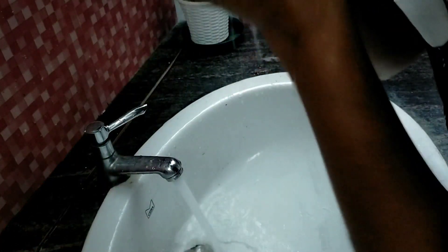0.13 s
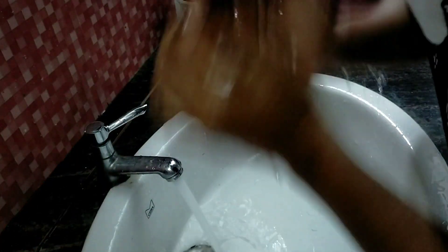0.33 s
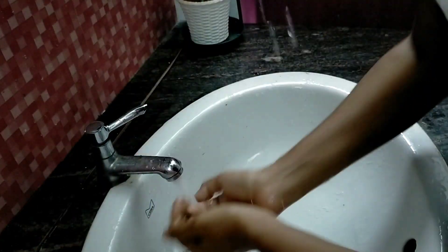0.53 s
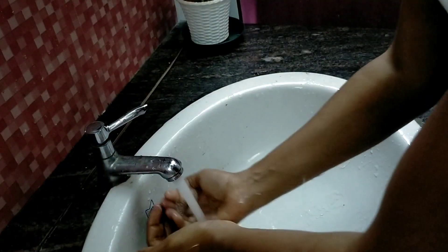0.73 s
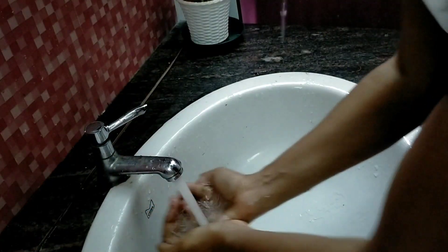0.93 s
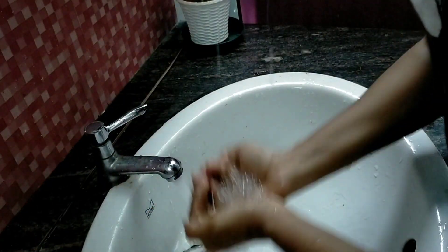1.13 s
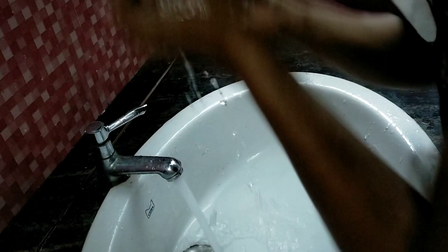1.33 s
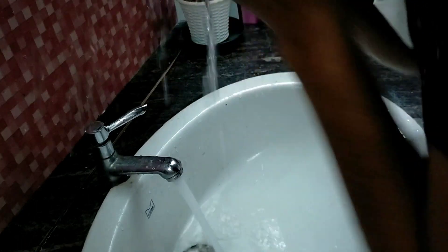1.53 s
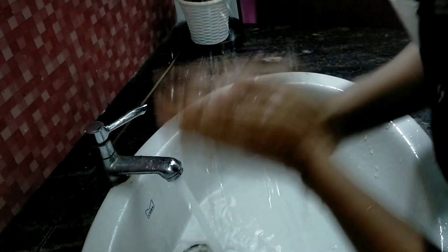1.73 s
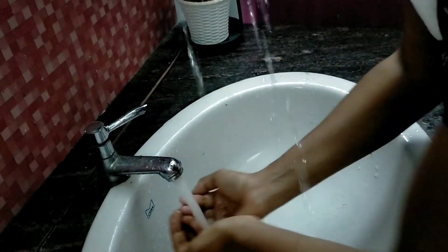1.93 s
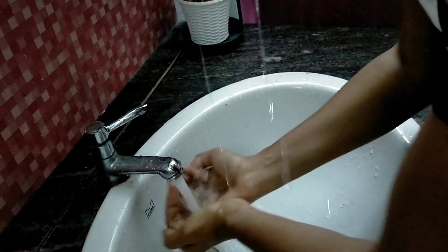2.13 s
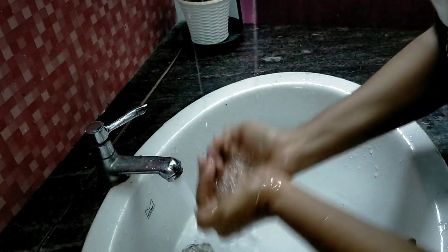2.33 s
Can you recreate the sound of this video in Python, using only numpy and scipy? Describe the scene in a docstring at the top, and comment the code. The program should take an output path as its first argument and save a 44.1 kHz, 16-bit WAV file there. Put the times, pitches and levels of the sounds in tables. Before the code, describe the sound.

A tap runs into a ceramic basin in a small tiled bathroom, bright and hissing; cupped hands hush it, then water drops back in two splashy bursts, heard close with a short room echo.

```python
"""A tap's jet spatters on the glaze of a ceramic basin in a small tiled bathroom, hushed while cupped hands catch it.
The spatter is shaped noise with droplet bursts and tiny bubbles; the gurgle is noise and bubbles ringing in the bowl.
Water falls back from the hands as splats (noise bursts), plops and drips (single bubbles with rising pitch).
The basin is knocked a few times (decaying modes), and a low hum lies beneath."""
import sys
import numpy as np
from scipy import signal
from scipy.fft import rfft, irfft
from scipy.io import wavfile

SR = 44100
rng = np.random.default_rng(int(sys.argv[2]) if len(sys.argv) > 2 else 0)


def file_out(sig):
    """Save sig as 16-bit WAV at sys.argv[1]."""
    # one column per channel
    cols = np.atleast_2d(sig).T
    # limit, then scale
    lim = np.clip(cols, -1, 1)
    pcm = np.round(lim * 32767).astype(np.int16)
    wavfile.write(sys.argv[1], SR, pcm)


N = 108882   # samples

# Course of the jet, joined by straight lines: start_s [s], hiss_db [dB rms], gurgle_db [dB rms]
JET_COURSE = [(0, -34.5, -44.5), (.12, -39, -46), (.3, -37.5, -48), (.47, -38.5, -46), (.645, -38, -47),
              (0.669, -43.5, -47), (.9, -43.5, -49), (1.1, -46.5, -49), (1.19, -46, -50.5),
              (1.235, -38, -46), (1.33, -39, -46.5), (1.42, -34, -43.5), (1.445, -36, -40),
              (1.53, -38, -45), (1.7, -36.5, -48.5), (1.817, -37, -41), (1.824, -32, -36.5),
              (1.87, -37, -39.5), (1.9, -41, -42), (1.94, -32, -46.5), (1.98, -41, -46.5),
              (2.07, -39.5, -48), (2.16, -44, -49), (2.35, -46.5, -50), (2.41, -39, -46),
              (2.469, -38.5, -43.5)]
# Colour of water striking the glaze: pitch_hz [Hz], gain_db [dB, relative]
SPATTER_COLOUR = [(1200, -9), (2300, -8.5), (3500, -13.5), (4180, -10), (5990, -11.5), (7200, -7.5),
                  (7890, -2.5), (8300, 0), (9480, -5.5), (10900, -4), (12600, -7), (14000, -4.5),
                  (15100, -0.5), (15600, -5)]
DROPLETS_PER_S, DROPLET_DECAY_S = 900, 0.00096   # the rate is nominal and wanders
DROPLET_SPREAD_DB, DROPLET_SHARE_DB = 4, -3.5
FIZZ_PER_S, FIZZ_CYCLES, FIZZ_SHARE_DB = 300, 50.7, -8.5   # tiny high bubbles
SPATTER_LOW_HZ = 2704   # the hiss of the stream starts here


def droplet_patter():
    """Shot noise: random impacts, each a decaying noise burst in one of five registers."""
    born = rng.random(N) < DROPLETS_PER_S * amp(4 * drift(25)) / SR
    sizes = born * amp(DROPLET_SPREAD_DB * np.minimum(rng.exponential(1, N), 4))
    register = rng.integers(0, 5, N)
    decay = np.exp(-1 / (DROPLET_DECAY_S * SR))
    patter = np.zeros(N)
    for k, hz in enumerate(np.geomspace(3000, 13000, num=5)):
        impacts = sizes * (register == k) + 1e-18   # the tiny offset keeps the filter off zero
        burst = signal.lfilter([1], [1, -decay], impacts) * rng.standard_normal(N)
        band = signal.butter(1, [hz / 2.69, hz * 1.695], "band", fs=SR, output="sos")
        patter += signal.sosfilt(band, burst)
    return rms_one(patter)


def spatter():
    """Broadband impact noise: a turbulent sheet, bubble fizz and droplets share one spectrum."""
    sheet = amp(0.854 * drift(5.9)) * rng.standard_normal(N)
    fizz = amp(FIZZ_SHARE_DB) * swarm(FIZZ_PER_S, 2800, 15062, FIZZ_CYCLES)
    droplets = amp(DROPLET_SHARE_DB) * droplet_patter()
    stream = colour(sheet + fizz + droplets, SPATTER_COLOUR)
    high = signal.butter(4, SPATTER_LOW_HZ, "high", fs=SR, output="sos")
    start_s, hiss_db, _ = np.transpose(JET_COURSE)
    return amp(over_time(start_s, hiss_db)) * rms_one(signal.sosfilt(high, stream))


# Colour of the gurgle: pitch_hz [Hz], gain_db [dB, relative]
GURGLE_COLOUR = [(180, -51.5), (300, -11.5), (371, -10.5), (432, -11.5), (758, -23), (1100, -6.5),
                 (1320, -10.5), (1400, -6), (2040, 1), (2290, 2.5), (2500, 3.5), (3290, 1), (6000, -12),
                 (7800, -27), (13200, -120)]
# Air resonances of the bowl: pitch_hz [Hz], width_hz [Hz], level_db [dB, relative to the direct wash]
BOWL_RESONANCES = [(1005, 29.5, -2), (1221.5, 25.6, -1), (1423.3, 19, -0.5), (1633.4, 55.4, 0),
                   (1870, 17.6, 1), (2210, 54, 0.5), (2333.5, 27.4, -2), (2959.5, 39.3, 2.5)]
BUBBLES_PER_S, BUBBLE_CYCLES, BUBBLE_SHARE_DB = 1000, 14.59, -8.5
BRIGHTEN_S, BRIGHTEN_HZ, BRIGHTEN_DB = 2.1, 2600, -4   # from then on the gurgle below that pitch sinks


def gurgle():
    """Forced resonance: a wash of noise and small bubbles excites the air modes of the bowl."""
    wash = amp(1.37 * drift(7.06)) * rng.standard_normal(N)
    wash += amp(BUBBLE_SHARE_DB) * swarm(BUBBLES_PER_S, 906.4, 5102, BUBBLE_CYCLES)
    rung = wash.copy()
    for pitch_hz, width_hz, level_db in BOWL_RESONANCES:
        r = np.exp(-np.pi * width_hz / SR)
        poles = [1, -2 * r * np.cos(2 * np.pi * pitch_hz / SR), r * r]
        rung += amp(level_db) * signal.lfilter([(1 - r * r) / 2, 0, (r * r - 1) / 2], poles, wash)
    body = rms_one(colour(rung, GURGLE_COLOUR))
    # the low part sinks over a tenth of a second
    low = signal.sosfiltfilt(signal.butter(4, BRIGHTEN_HZ, fs=SR, output="sos"), body)
    sink = (1 - amp(BRIGHTEN_DB)) * np.clip((np.arange(N) / SR - BRIGHTEN_S) * 10, 0, 1)
    start_s, _, gurgle_db = np.transpose(JET_COURSE)
    return amp(over_time(start_s, gurgle_db)) * (body - sink * low)


# Splats of falling water: start_s [s], level_db [dB, before colouring], decay_s [s], pitch_hz [Hz, centre]
FALLING_SPLATS = [(.0365, -20.5, 0.00208, 6800), (.0614, -17, 0.00145, 12100),
                  (0.0685, -15.5, 0.00322, 3750), (.071, -16.5, 0.0016, 7000), (.0897, -18.5, 0.002, 9200),
                  (.161, -26, 0.0057, 6000), (0.22, -29, 0.003, 8900), (.2546, -14.5, 0.00103, 7940),
                  (0.3522, -25, 0.00245, 9000), (.501, -22, 0.00229, 5870), (0.5856, -25, 0.00327, 9120),
                  (0.6324, -20, 0.00208, 10400), (.905, -29, 0.0024, 11900), (1.207, -23, 0.00094, 9000),
                  (1.2331, -32.5, 0.0043, 9800), (1.2564, -26.5, 0.00177, 13000),
                  (1.289, -16, 0.00107, 13000), (1.294, -23.5, 0.0038, 11000), (1.3176, -24, 0.0026, 12000),
                  (1.3443, -25.5, 0.0047, 9000), (1.4245, -20.5, 0.008, 1290),
                  (1.4323, -18.5, 0.0074, 2200), (1.644, -24.5, 0.00323, 7950), (1.6916, -27, 0.0054, 8950),
                  (1.7634, -23.5, 0.00324, 9050), (1.8209, -17.5, 0.0049, 3000), (1.8312, -21, 0.005, 8860),
                  (1.842, -17, 0.0025, 13000), (1.849, -19.5, 0.00328, 1625), (1.8514, -16.5, 0.0021, 7900),
                  (1.881, -23.5, 0.0045, 10000), (1.88, -28, 0.0028, 2200), (1.909, -25.5, 0.011, 1446),
                  (1.916, -24.5, 0.0037, 7000), (1.931, -21.5, 0.00207, 9000), (1.942, -22, 0.00238, 7900),
                  (1.947, -16, 0.00086, 11000), (1.952, -20.5, 0.00206, 5200), (1.964, -22.5, 0.002, 5500),
                  (1.99, -20, 0.00298, 6740), (2.0323, -7, 0.00128, 13250), (2.272, -33, 0.0028, 6400),
                  (2.39, -26, .004, 2600), (2.411, -23, 0.00164, 10000), (2.4533, -22, 0.00184, 10000)]
SPLAT_OCTAVES, SPLAT_ATTACK_S = 0.587, 0.000653   # spread of the colour about its centre; onset


def splats():
    """Transient impact noise: short bursts, each in its own register, tinted like the spatter."""
    start_s, level_db, decay_s, pitch_hz = np.transpose(FALLING_SPLATS)
    t = np.arange(1024) / SR
    octaves = np.log2((np.arange(513) + 1) * SR / 1024 / pitch_hz[:, None])
    register = np.exp(-.5 * (octaves / SPLAT_OCTAVES) ** 2)
    noise = irfft(rfft(rng.standard_normal((len(start_s), len(t)))) * register)
    noise /= noise.std(axis=1, keepdims=True)
    shape = np.exp(-t / decay_s[:, None]) * (1 - np.exp(-t / SPLAT_ATTACK_S))
    return colour(lay(start_s, amp(level_db)[:, None] * shape * noise), SPATTER_COLOUR)


# Plops, one large bubble each: start_s [s], level_db [dB peak], pitch_hz [Hz, at start], cycles [periods]
BUBBLE_PLOPS = [(0.092, -34, 3520, 15.5), (0.483, -43.5, 1625, 6.9), (.633, -38, 2378, 10.8),
                (.729, -43, 1085, 9.5), (1.196, -31.5, 3976, 10.7), (1.296, -43, 981, 10.1),
                (1.3, -31.5, 2850, 8.2), (1.309, -29, 3020, 6.9), (1.268, -31.5, 3040, 6),
                (1.306, -42.5, 825, 21), (1.342, -35, 2400, 12.8), (1.386, -32.5, 2850, 9),
                (1.409, -30.5, 2540, 6.1), (1.424, -28.5, 1005, 17.6), (1.433, -14, 2272, 9.47),
                (1.4375, -24, 2380, 4.5), (1.457, -37, 2210, 5.1), (1.477, -40.5, 2107, 15),
                (1.611, -36, 2304, 11.5), (1.72, -29.5, 2502, 12.1), (1.785, -40.5, 1405, 19.7),
                (1.823, -27, 2930, 11), (1.83, -28.5, 2195, 4.7), (1.85, -25, 1753, 4.54),
                (1.8525, -25, 2240, 9.9), (1.889, -33.5, 2146, 11.4), (1.864, -34, 1935, 10.5),
                (1.9385, -37.5, 2883, 12.2), (1.925, -31.5, 1752, 11.8), (1.987, -35, 2007, 9.9),
                (2.066, -36, 2350, 10.4), (2.272, -33.5, 5620, 8.7), (2.23, -43, 1170, 16)]


def plops():
    """Bubble resonance: each trapped volume of air rings as one damped sine."""
    start_s, level_db, pitch_hz, cycles = np.transpose(BUBBLE_PLOPS)
    return bubbles(start_s, level_db, pitch_hz, cycles, rise=.012, swell=1.18)


# Drips, one closing bubble each: start_s [s], level_db [dB peak, before flutter], pitch_hz [Hz, at start],
# cycles [periods], rise [share of start pitch per quarter of its life]
CLOSING_DRIPS = [(.034, -31, 3850, 14.6, 0.047), (.035, -37, 1736, 12.8, 0.149),
                 (.062, -37.5, 3820, 16.6, 0.048), (.068, -26, 2600, 15, 0.141),
                 (.959, -42.5, 985, 17.1, 0.1684), (1.908, -37.5, 800.2, 21.8, 0.33)]
DRIP_FLUTTER_DB, DRIP_FLUTTER_HZ = 4, 150


def drips():
    """Rising bubble resonance: the pitch sweeps up as the bubble closes and its tone breaks up."""
    flutter = amp(DRIP_FLUTTER_DB * drift(DRIP_FLUTTER_HZ))
    return flutter * bubbles(*np.transpose(CLOSING_DRIPS), swell=1.248)


# Knocks on the basin: start_s [s], level_db [dB, strength of the blow]
BASIN_KNOCKS = [(.447, -50), (.4565, -54), (.4665, -48), (1.418, -49.5), (1.424, -41.5), (1.85, -52)]
# Modes of the basin: pitch_hz [Hz], level_db [dB, relative], t60_s [s]
BASIN_MODES = [(99.4, -3, 0.335), (122.9, -4.5, 0.202), (163.3, -1.5, 0.0837), (232.5, 0.5, 0.053),
               (426, -4.5, 0.042), (535.4, 0, 0.092), (632, -4, 0.1)]
KNOCK_SOFT_HZ = 900   # a soft contact dulls the blow


def knocks():
    """Modal vibration: each blow strikes every basin mode with its own strength."""
    start_s, level_db = np.transpose(BASIN_KNOCKS)
    luck_db = rng.normal(0, 1.5, (len(start_s), len(BASIN_MODES)))
    ringing = np.zeros(N)
    for k, (pitch_hz, mode_db, t60_s) in enumerate(BASIN_MODES):
        blows = np.full(N, 1e-18)
        blows[(start_s * SR).astype(int)] = -amp(level_db + mode_db + luck_db[:, k])
        r, w = amp(-60 / (t60_s * SR)), 2 * np.pi * pitch_hz / SR
        ringing += signal.lfilter([0, np.sin(w)], [1, -2 * r * np.cos(w), r * r], blows)
    return signal.sosfilt(signal.butter(2, KNOCK_SOFT_HZ, fs=SR, output="sos"), ringing)


ROOM_T60_S, ROOM_DB, WALL_CUT_HZ = .2, -16, 5000


def room(x):
    """Diffuse reverberation: tiled walls return a decaying, dulled noise tail after a 3 ms gap."""
    t = np.arange(SR // 2) / SR
    tail = rng.standard_normal(len(t)) * amp(-60 * t / ROOM_T60_S) * (t > .003)
    tail = signal.sosfilt(signal.butter(1, WALL_CUT_HZ, fs=SR, output="sos"), tail)
    return amp(ROOM_DB) * signal.fftconvolve(x, tail / np.sqrt(np.sum(tail ** 2)))[:N]


# Colour of the low hum: pitch_hz [Hz], gain_db [dB, relative]
HUM_COLOUR = [(12, 0), (20, -7), (61, -1), (133, -9), (166, -3.5), (357, -22), (484, -15.5), (767, -14.5),
              (900, -8), (1170, -57.5), (1980, -120)]
HUM_DB = -60.5   # nominal, before the swing and drift
HUM_FOLLOWS_JET = 0.306   # the basin rumbles with the jet: share of the hiss's swing in dB


def hum():
    """Filtered noise floor: a low rumble whose level partly follows the jet."""
    start_s, hiss_db, _ = np.transpose(JET_COURSE)
    swing_db = HUM_FOLLOWS_JET * over_time(start_s, hiss_db - hiss_db.mean())
    level = amp(HUM_DB + swing_db + 1.1 * drift(9.4))
    return level * rms_one(colour(rng.standard_normal(N), HUM_COLOUR))


BUBBLE_SPREAD_DB, BUBBLE_RISE = 2.5, .015   # rise: share of start pitch per quarter of a bubble's life


def swarm(per_s, low_hz, high_hz, cycles):
    """Statistical bubble cloud: random times, sizes and pitches, scaled to rms 1."""
    draw = rng.random((3000, 4))
    draw = draw[draw[:, 3] < per_s * N / SR / 3000]   # thin out to the wanted rate
    level_db = -BUBBLE_SPREAD_DB * np.log(1 - .97 * draw[:, 1])
    pitch_hz = low_hz * (high_hz / low_hz) ** draw[:, 2]
    return rms_one(bubbles(draw[:, 0] * N / SR, level_db, pitch_hz, cycles, BUBBLE_RISE))


def bubbles(start_s, level_db, pitch_hz, cycles, rise, swell=1.86):
    """Bubble resonance: sines swell and die, their pitch rising as the bubble nears the surface."""
    turns = np.arange(1300) / SR * pitch_hz[:, None]
    life = turns / np.reshape(cycles, (-1, 1)) * 4   # in quarters of the ringing length
    shape = (life / swell * np.exp(1 - life / swell)) ** swell   # peaks at 1
    phase = 2 * np.pi * turns * (1 + np.reshape(rise, (-1, 1)) * life / 2)
    return lay(start_s, amp(level_db)[:, None] * shape * np.sin(phase))


def lay(start_s, grains):
    """Superposition: sum one grain per row at its time."""
    out = np.zeros(N + grains.shape[1] + SR)
    np.add.at(out, (start_s * SR).astype(int)[:, None] + np.arange(grains.shape[1]), grains)
    return out[:N]


def colour(x, spectrum):
    """Minimum-phase filtering: a causal filter made from the spectrum by folding its cepstrum."""
    size = 4096
    hz, db = np.transpose(spectrum)
    gain_db = np.interp(np.log(np.arange(size // 2 + 1) * SR / size + 1), np.log(hz), db)
    cepstrum = irfft(np.log(amp(gain_db)))
    cepstrum[1:size // 2] *= 2
    cepstrum[size // 2 + 1:] = 0
    return signal.fftconvolve(x, irfft(np.exp(rfft(cepstrum))))[:N]


def drift(rate_hz):
    """Random modulation: low-passed noise of rms 1."""
    r = np.exp(-2 * np.pi * rate_hz / SR)
    walk = signal.lfilter([1], [1, -2 * r, r * r], rng.standard_normal(N + SR))
    return rms_one(walk[SR:])   # the first second settles the filter


def over_time(start_s, values):
    """Linear interpolation: straight lines between the given times."""
    return np.interp(np.arange(N) / SR, start_s, values)


def amp(db):
    """Decibel law: level to amplitude gain."""
    return 10 ** (np.asarray(db) / 20)


def rms_one(x):
    """Power normalisation: scale to rms 1."""
    return x / np.sqrt(np.mean(x ** 2) + 1e-20)


def scene():
    """Superposition of jet, falling water and knocks, the last two reverberant, over a low hum."""
    events = splats() + plops() + drips() + knocks()
    return (spatter() + gurgle() + events + room(events) + hum())[None]


def record(dry):
    """Band limiting: a steep low-pass cuts the top."""
    return signal.sosfilt(signal.ellip(12, .5, 60, 15600, fs=SR, output="sos"), dry)


dry = scene()
out = record(dry)
file_out(out)
```